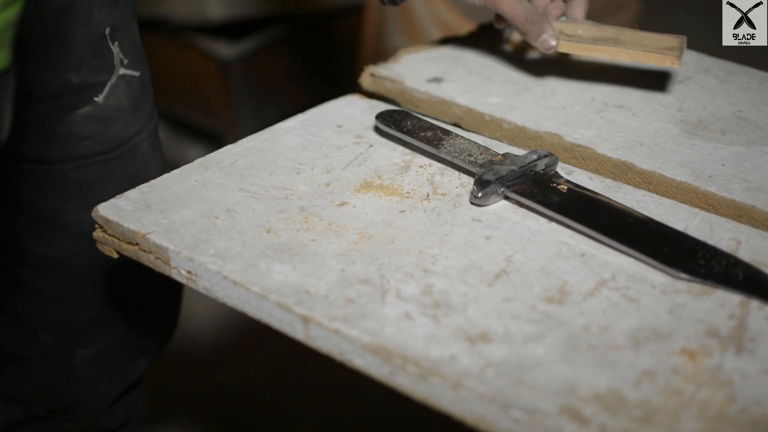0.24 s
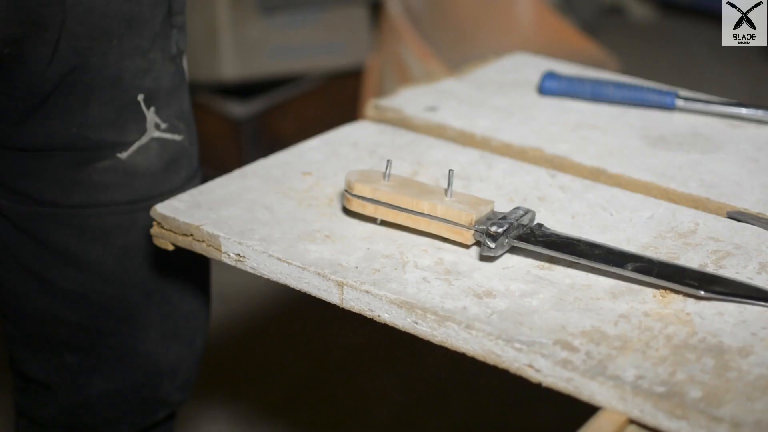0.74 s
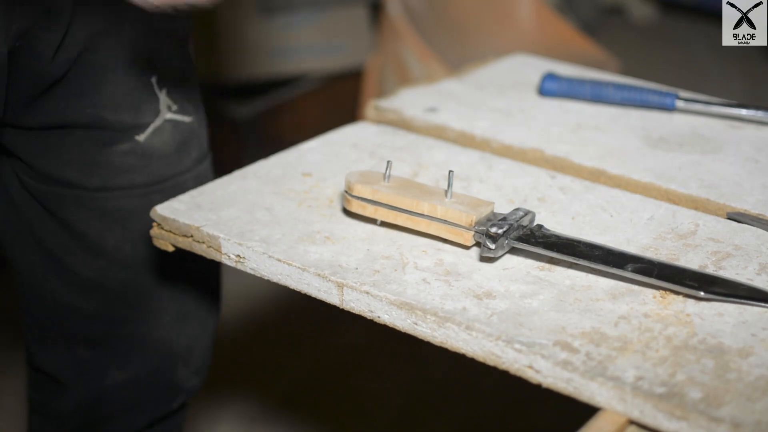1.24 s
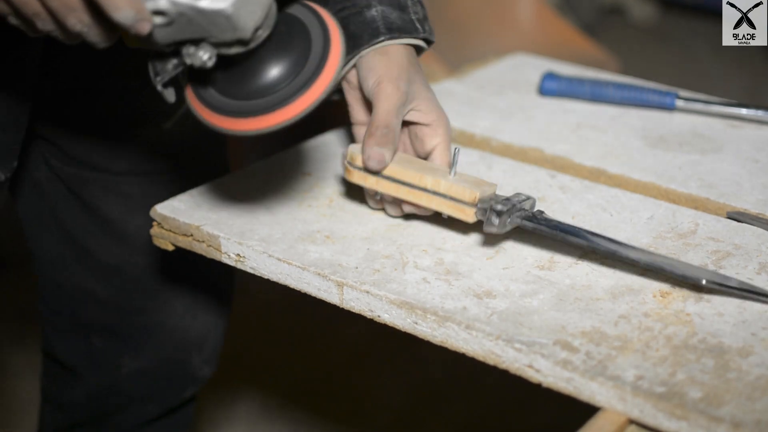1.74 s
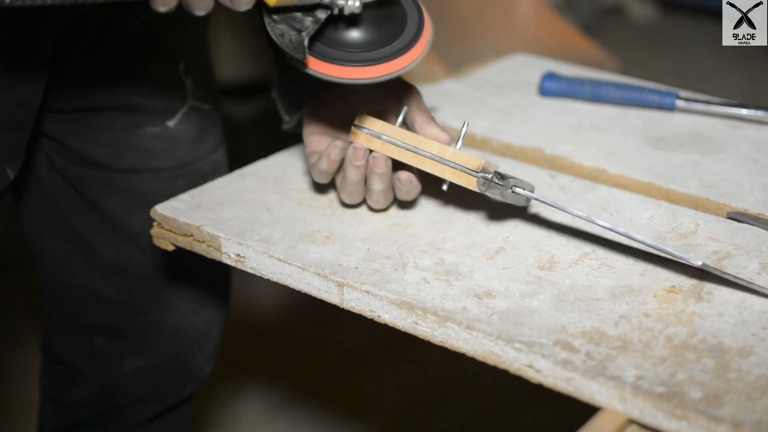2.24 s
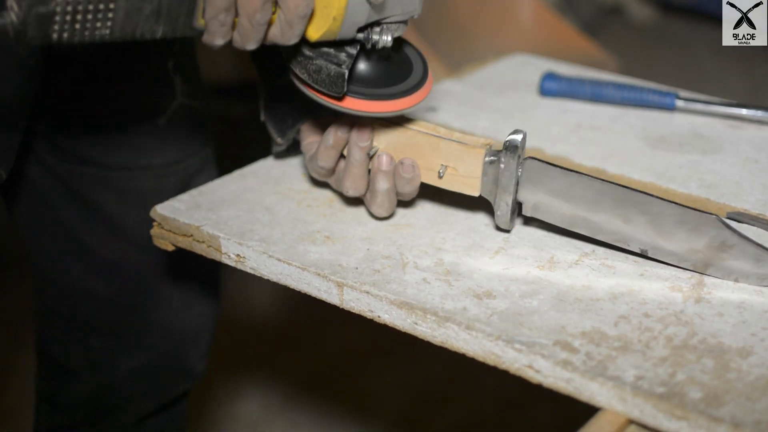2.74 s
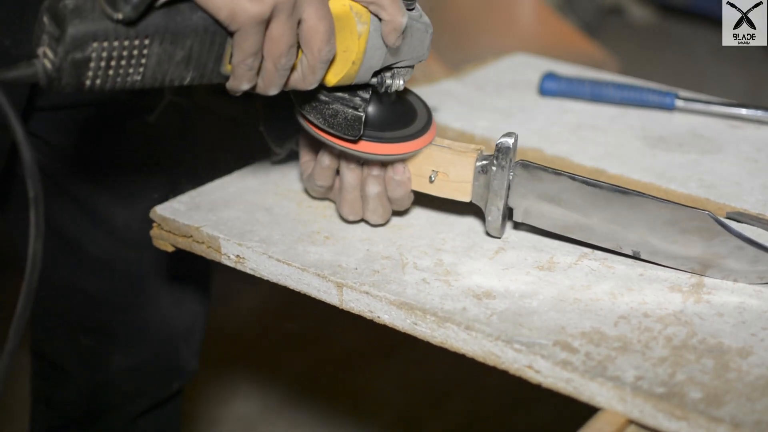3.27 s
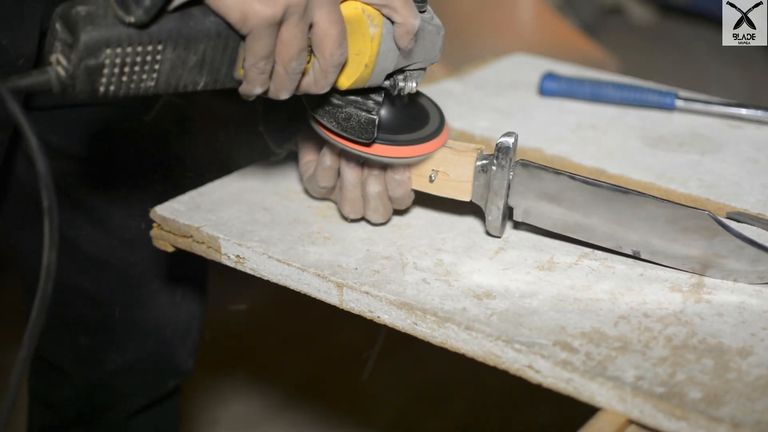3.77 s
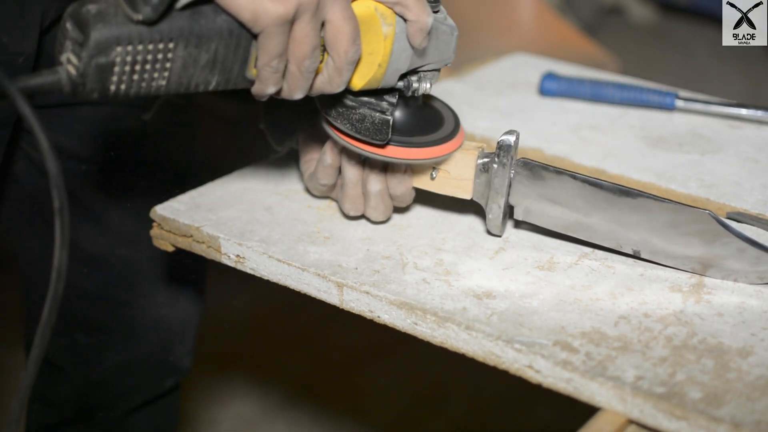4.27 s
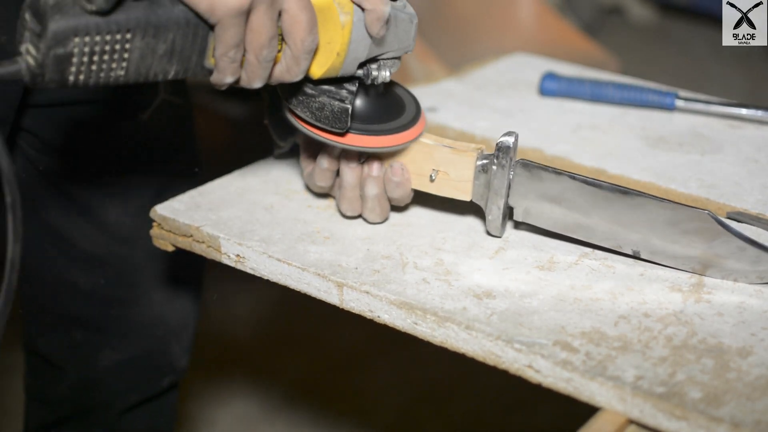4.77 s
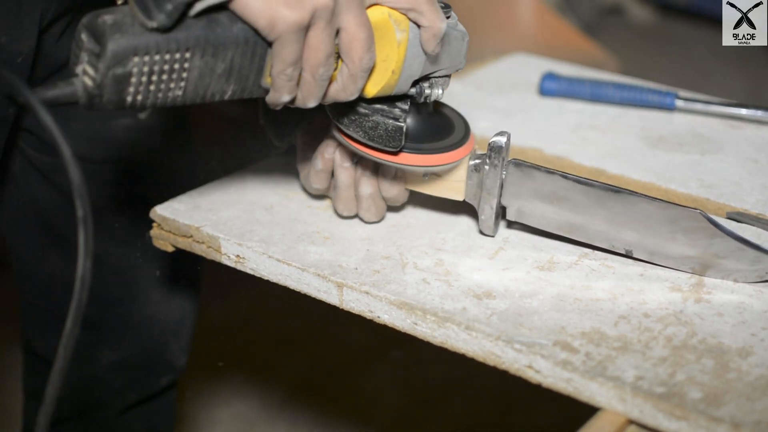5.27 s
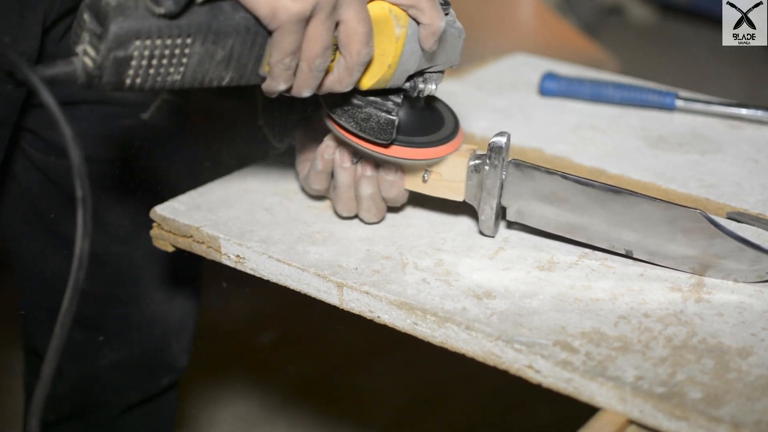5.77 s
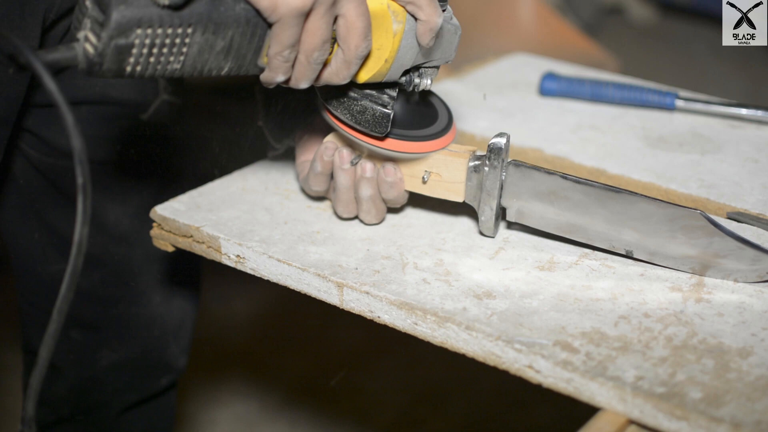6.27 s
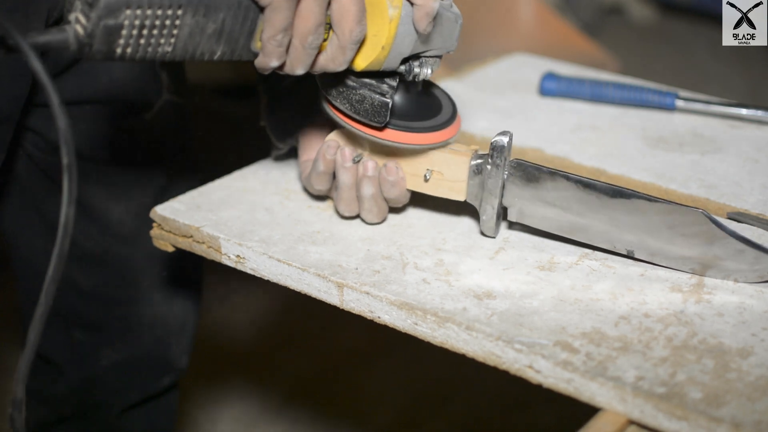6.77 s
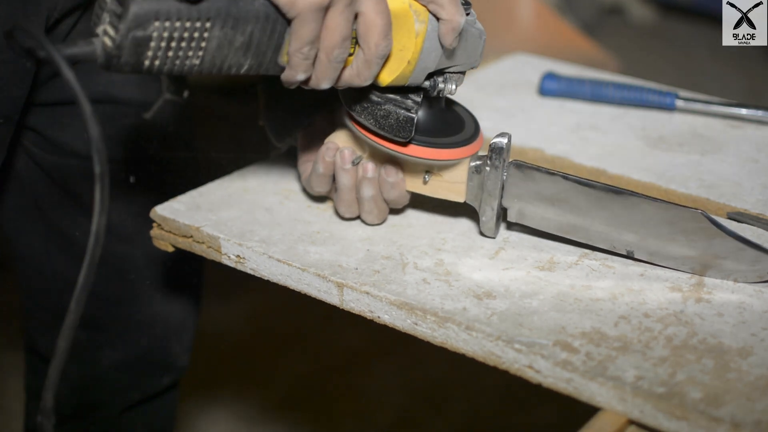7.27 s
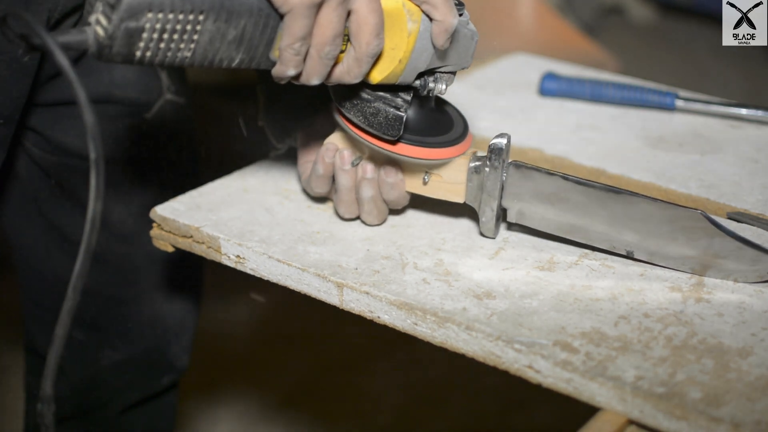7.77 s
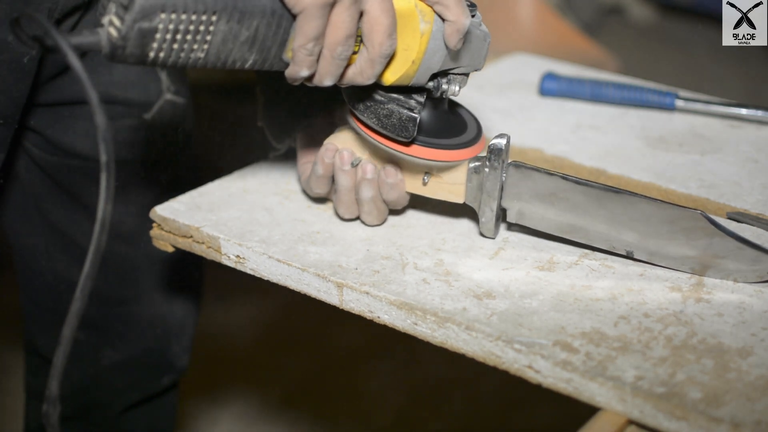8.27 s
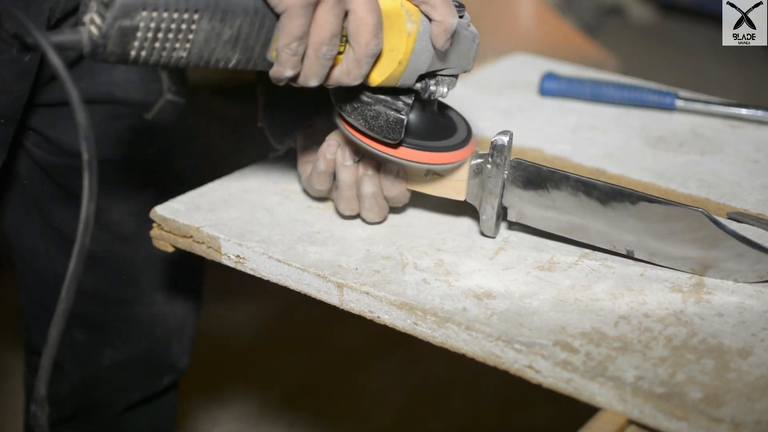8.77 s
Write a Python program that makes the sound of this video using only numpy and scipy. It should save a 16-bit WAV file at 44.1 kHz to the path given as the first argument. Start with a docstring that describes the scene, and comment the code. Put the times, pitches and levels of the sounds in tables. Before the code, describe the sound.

In a quiet, faintly humming workshop a rustle fades and a piece of wood lands with a quick double clack. After a sudden hush, a grinder switches on close by, crackling and buzzing as it runs up to a loud whining rush. Its gears rattle, then the sanding disc hisses over wood in long passes, briefly lifting between them. Close microphone, nearly central stereo, short dry reflections.

```python
"""In a quiet, humming workshop a rustle fades and a wooden handle scale is set down: its modes ring on the bench.
All drops to a hush, then an angle grinder starts up close: its brushes spit on every mains half-wave, then only fizz.
Fan rush, gears and motor whine follow the shaft speed as it runs up; cooling air hisses from the vents.
Then the disc sands the handle: each pass hisses, drags the speed down and takes up the play in the gears,
which rattle again when it lifts. Bench and walls scatter the sound into a nearly central stereo pair."""
import sys
import numpy as np
from scipy import signal
from scipy.fft import rfft, irfft
from scipy.io import wavfile
from scipy.ndimage import map_coordinates

SR = 44100
rng = np.random.default_rng(int(sys.argv[2]) if len(sys.argv) > 2 else 0)


def pcm_store(signal):
    """Save signal as 16-bit PCM."""
    levels = np.round(np.clip(np.atleast_2d(signal), -1, 1) * 32767)
    wavfile.write(sys.argv[1], SR, levels.astype(np.int16).T)


N = 397782
TIME = np.arange(N) / SR
MAINS_HZ = 50
GEAR_RATIO = 9 / 32  # disc turns per shaft turn
SWITCH_ON_S = .7965
# the tool is tipped so that its gear case faces the listener
TIP_S, TIP_LENGTH_S = 2.6, .3
# The motor flares up as it starts.
# Each row: start in seconds, dB added to the rush, dB added to the sparks.
FLARES = [(.955, 6.5, 4.5), (1.195, 1, 3), (1.4, 0.5, 0.5)]


def undb(db):
    """Decibels to gain."""
    return 10 ** (np.asarray(db) / 20)


def unit(x):
    """Scale to rms 1."""
    return x / np.sqrt(np.mean(x ** 2))


def noise():
    """White noise."""
    return rng.standard_normal(N)


def curve(table):
    """Rows of (seconds, value) joined by straight lines."""
    return np.interp(TIME, *np.transpose(table))


def walk(rate):
    """Random wander of rms 1 that heads for a new value rate times a second."""
    return unit(np.interp(TIME * rate, np.arange(N), noise()))


def ramp(start, length):
    """Rises from 0 at the start to 1 over the given length."""
    return np.clip((TIME - start) / length, 0, 1)


def bump(centre, length):
    """Swells smoothly to 1 and back."""
    return np.exp(-(2 * (TIME - centre) / length) ** 2)


def fade(start, t60):
    """Envelope that jumps to 1 and falls 60 dB in t60 seconds."""
    return (TIME >= start) * undb(np.maximum(-60 * np.abs(TIME - start) / t60, -300))


def colour(x, points):
    """Causal minimum-phase filter with the given (Hz, dB) response, made through its cepstrum."""
    hz, db = np.transpose(points)
    size = 8192
    bins = np.arange(size // 2 + 1) * SR / size
    log_gain = np.log(undb(np.interp(np.log(bins + 1), np.log(hz), db)))
    cepstrum = irfft(log_gain)
    # fold the negative times onto the positive ones
    cepstrum[1:size // 2] *= 2
    cepstrum[size // 2 + 1:] = 0
    response = irfft(np.exp(rfft(cepstrum)))
    return signal.fftconvolve(x, response)[:N]


def resonate(x, hz, width):
    """Two-pole resonance, gain 1 at its centre, width in Hz."""
    return signal.lfilter(*signal.iirpeak(hz, hz / width, fs=SR), x)


def room(room_db=-60, slide_db=-55, hum_width=.015):
    """The quiet workshop: wavering room noise, narrow steady hums and a rustle that fades away."""
    # Each row: frequency in Hz, relative level in dB.
    room_colour = [(30, -18), (55, -18), (80, -0.5), (120, -4.5), (400, 1.5), (750, 2.5), (1200, 1.5),
                   (2100, -4), (4000, -20), (14000, -36)]
    # The rustle; each row: frequency in Hz, relative level in dB.
    slide_colour = [(200, -22), (700, -7), (2000, 3), (4000, 0), (6500, -2), (10000, -11), (15000, -22)]
    # Hums of the workshop; each row: frequency in Hz, level in dB.
    hums = [(398, -70.5), (750, -69.5), (2010, -74), (2800, -77)]
    out = undb(room_db) * unit(colour(noise(), room_colour)) * undb(walk(8.4))
    out += undb(slide_db) * unit(colour(noise(), slide_colour)) * fade(0, 1.02) * undb(2 * walk(80))
    out += sum(undb(db) * unit(resonate(noise(), hz, hz * hum_width)) for hz, db in hums)
    return out


def wooden_scale(knock_db=4, ring_db=4):
    """The scale lands one end after the other: a knock and a sharp tick set off its decaying modes."""
    # Touch-downs; each row: time in seconds, relative level in dB, relative level of the tick in dB.
    clacks = [(.483, -51.5, -24), (.527, -48, -11)]
    # Modes of the wood on the bench; each row: frequency in Hz, relative level in dB, t60 in seconds.
    wood = [(710, -3, 0.22), (906, 7, 0.053), (1120, 3, 0.054), (1220, 6, 0.055), (1570, -1, 0.12),
            (1760, 1, .06), (2300, -15, .04), (3100, -11, 0.044)]
    knock_colour = [(300, -25), (800, 0), (1900, 1), (2800, -2), (3800, -12), (12000, -36)]
    out = np.zeros(N)
    for s, db, tick_db in clacks:
        ring = 0
        for k, (hz, mode_db, t60) in enumerate(wood):
            # neighbouring modes start in opposite directions
            mode = (-1) ** k * np.sin(2 * np.pi * hz * (TIME - s))
            ring = ring + undb(mode_db) * fade(s, t60) * mode
        knock = unit(colour(noise(), knock_colour)) * fade(s, .07)
        # the tick comes 3 ms ahead of the knock
        tick = unit(resonate(noise(), 7000, 14000)) * fade(s - .003, 0.022)
        out += undb(db) * (undb(ring_db) * ring + undb(knock_db) * knock + undb(tick_db) * tick)
    return out


def motor_speed(force, free_hz=631.7, run_up_s=.247, run_up_shape=.585, sag_hz=70, inertia_s=.862):
    """Shaft turns per second: a quick run-up that levels out, less a sag that follows the force slowly."""
    running_s = np.maximum(TIME - SWITCH_ON_S, 0)
    run_up = 1 - np.exp(-(running_s / run_up_s) ** run_up_shape)
    keep = np.exp(-1 / (inertia_s * SR))
    slow_force = signal.lfilter([1 - keep], [1, -keep], force)
    return free_hz * run_up - sag_hz * slow_force


def flare(start, attack_s=0.03, decay_s=0.082):
    """A quick swell that dies away."""
    return ramp(start, attack_s) * np.exp(-np.maximum(TIME - start - attack_s, 0) / decay_s)


def sparking(spark_db=-28, attack_s=0.14, hold_end_s=1.96, fall_db_per_s=22, fizz_db=-45):
    """Strength of the sparks: high while the motor draws its starting current, then a faint fizz."""
    db = np.maximum(spark_db - fall_db_per_s * np.maximum(TIME - hold_end_s, 0), fizz_db)
    flare_db = sum(added_db * flare(s) for s, _, added_db in FLARES)
    return ramp(SWITCH_ON_S, attack_s) * undb(db + flare_db)


def brushes(speed, spark_s=0.001, scatter_db=3.5, steady=0.18, first_db=-27, ping_db=-36):
    """Current is switched in on each mains half-wave and the brushes spit."""
    # Each row: frequency in Hz, relative level in dB.
    spark_colour = [(300, -26), (700, -9.5), (1100, -5.5), (1900, -8), (2600, -4.5), (4000, 2), (4600, -5),
                    (5200, -1.5), (7000, -10), (9000, -3), (10600, -12), (11400, 0), (12000, 2.5),
                    (13200, -9), (15700, -14)]
    kick_colour = [(300, -39), (1200, 0), (1900, 9), (5000, -4), (8000, -6), (15000, -21)]
    half_waves = np.maximum(TIME - SWITCH_ON_S, 0) * 2 * MAINS_HZ
    # time since the half-wave began, in spark lengths
    age = half_waves % 1 / (2 * MAINS_HZ * spark_s)
    # the sparks grow more uneven as the rotor gathers speed
    scatter = np.clip(noise(), -2, 1.5)[half_waves.astype(int)]
    size = undb(scatter_db * speed * scatter)
    surge = size * age * np.exp(1 - age)
    spits = noise() * (surge + steady * (.5 + speed))
    # while the rotor is still slow, each surge jolts the armature and it pings
    slow = np.interp(speed, [.15, .35, .6], [0, 1, 0])
    pings = unit(resonate(resonate(noise() * surge, 5200, 600), 5300, 600)) * slow
    first_kick = unit(colour(noise(), kick_colour)) * fade(SWITCH_ON_S, 0.023)
    spits = unit(colour(spits, spark_colour)) * sparking()
    return spits + undb(ping_db) * pings + undb(first_db) * first_kick


def fan_and_gears(shaft, speed, load, tooth_db=0.5, flutter_db=0.28, grain_db=4):
    """Dense tooth impacts and fan turbulence, a little uneven, louder with speed and softer under load."""
    # Each row: frequency in Hz, relative level in dB.
    rush_colour = [(30, -35.5), (250, -36), (350, -31), (480, -16), (700, -18), (950, -8.5), (1150, -5),
                   (1500, -1.5), (2500, -1), (3100, -6.5), (4200, -7.5), (7300, -10), (10000, -16),
                   (15700, -21)]
    rush_db, speed_power, loaded_db = -23, 1.34, -1
    uneven_db = tooth_db * walk(700) + flutter_db * walk(45)
    grains = noise() * undb(grain_db * np.clip(noise(), -2, 2) + uneven_db)
    impacts = grains * (1 + 0.11 * np.cos(2 * np.pi * shaft))
    # the tool starts 4 dB down and is brought over the work
    db = rush_db + loaded_db * load - 4 * (1 - ramp(1.3, 1))
    db = db + sum(added_db * flare(s) for s, added_db, _ in FLARES)
    # the rush dips briefly
    db = db - 3.5 * bump(6.54, 0.13)
    return unit(colour(impacts, rush_colour)) * undb(db) * speed ** speed_power


def radiated(hz, response):
    """Gain of a (Hz, dB) response at a moving pitch."""
    return undb(np.interp(hz, *np.transpose(response)))


def tones(shaft, shaft_hz, speed, load, facing, waver_db=2, jitter=0.0056, whine_db=-2):
    """Lines of motor and disc; load shifts the weight among them and the housing colours moving pitches."""
    # How the housing radiates the shaft tone; each row: frequency in Hz, level in dB.
    shaft_response = [(300, -85), (370, -56), (430, -48), (515, -41), (570, -45.5), (585, -48),
                      (603, -47.5), (613, -57)]
    # The same for its fourth harmonic; each row: frequency in Hz, relative level in dB.
    whine_response = [(1200, -75), (1480, -54), (1720, -51), (1930, -38), (2100, -50), (2280, -44),
                      (2335, -38), (2395, -36.5)]
    # The same for the armature slots; each row: frequency in Hz, relative level in dB.
    slot_response = [(3000, -68), (3350, -53), (3750, -38), (4130, -35), (4480, -28.5), (4700, -36),
                     (5000, -55)]
    # Motor overtones at running speed.
    # Each row: multiple of the shaft rate, mean level in dB with the disc free, the same with it loaded.
    whine = [(3, -64, -57), (5, -54, -64), (6, -51, -46), (8, -62, -53), (9, -56, -41), (12, -51, -61),
             (24, -50, -62)]
    # Disc wobble at running speed.
    # Each row: multiple of the disc rate, relative level in dB with the disc free, the same with it loaded.
    wobble = [(1, -68.5, -74), (2, -70, -63), (3, -56.5, -61), (4, -59, -54.5), (5, -50, -57.5),
              (6, -64, -66), (7, -48, -48), (8, -47, -55), (9, -51, -48), (10, -54, -46), (20, -60, -49.5),
              (28, -56, -52.5)]
    shaft = shaft + jitter * walk(60)  # jitter in turns
    out = radiated(shaft_hz, shaft_response) * undb(walk(15)) * np.sin(2 * np.pi * shaft)
    # the fourth harmonic of the shaft sings out when the gears run slack
    slack_db = 6 * facing * (1 - load)
    fourth_gain = radiated(4 * shaft_hz, whine_response) * undb(whine_db + slack_db + walk(40))
    out += fourth_gain * np.sin(2 * np.pi * 4 * shaft)
    # twelve armature slots, throbbing with the mains current
    throb = 1 + .6 * np.cos(2 * np.pi * 2 * MAINS_HZ * (TIME - SWITCH_ON_S))
    out += radiated(12 * shaft_hz, slot_response) * throb * np.sin(2 * np.pi * 12 * shaft)
    # the disc drones more the faster it turns on the wood: dB per Hz of shaft rate from 582.2 Hz
    drone_db = 0.2837 * (shaft_hz - 582.2) * load
    for table, turns, swell_db in ((whine, shaft, 0), (wobble, shaft * GEAR_RATIO, drone_db)):
        for order, free_db, loaded_db in table:
            waver = waver_db * (walk(2.88) + walk(35)) / 2
            db = free_db + (loaded_db - free_db) * load + swell_db + waver
            out += undb(db) * np.minimum(speed, 1) ** 8 * np.sin(2 * np.pi * order * turns)
    return np.sqrt(2) * out  # sine levels become rms levels


def vents():
    """Cooling air hisses out of the slots, louder as they turn towards the listener."""
    # Each row: time in seconds, level in dB.
    vent_levels = [(.9, -55), (1.05, -41), (1.45, -40), (1.7, -33), (2.15, -31), (2.5, -32.5), (2.9, -37),
                   (3.3, -45)]
    air = resonate(resonate(noise(), 7300, 3100), 7300, 3100)
    return unit(air) * undb(curve(vent_levels))


def low_thuds():
    """Low, dull thuds: quickly fading low noise."""
    # Each row: start in seconds, level in dB.
    thuds = [(1.263, -44), (1.425, -47), (6.409, -41)]
    low_noise = unit(colour(noise(), [(30, 0), (300, -6), (900, -26), (4000, -60)]))
    return low_noise * sum(undb(db) * fade(s, .06) for s, db in thuds)


def backlash(load, facing, chatter_db=2.5, free_db=-31, loaded_db=-41.5):
    """Loose teeth knock irregularly and ring the gear case, most when the disc is lifted."""
    # Resonances of the gear case; each row: frequency in Hz, width in Hz, relative level in dB.
    case = [(2330, 240, 0.5), (2625, 140, 4), (2039, 270, -3), (3290, 180, -9)]
    knocks = noise() * undb(chatter_db * walk(300))
    level = facing * undb(free_db + (loaded_db - free_db) * load)
    return unit(sum(undb(db) * resonate(knocks, hz, width) for hz, width, db in case)) * level


def handwork(lift_s=.06, skim_db=-48, lean_db=3):
    """Force on the disc and the loudness of its bite: each pass beds in, holds and lifts off."""
    # The disc is laid on the wood.
    # Each row: start in seconds, end in seconds, time to bed in in seconds, relative force,
    # hiss in dB before the hand leans.
    passes = [(2.92, 4.34, 0.46, 1.055, -28.5), (4.573, 4.74, .06, .2, -35), (4.86, 6.58, .16, .953, -28.5),
              (6.92, 8.53, .08, .887, -28.5), (8.66, 9.099, .1, .795, -27.5)]
    # The hand leans in or eases off.
    # Each row: centre in seconds, length in seconds, change of force as a share.
    leans = [(3.971, 0.13, 0.38), (4.15, .2, -0.69), (5.551, .3, 0.21), (5.951, 0.26, -.66),
             (6.24, .1, .25), (6.45, .15, .38), (7.949, 0.39, .33)]
    lean = sum(change * bump(s, length) for s, length, change in leans)
    # a faint hiss of the disc just skimming goes on between passes
    force, hiss = 0, undb(skim_db) * ramp(TIP_S, TIP_LENGTH_S)
    for start, end, bed_in, push, db in passes:
        contact = ramp(start, bed_in) * (1 - ramp(end - lift_s, lift_s))
        force = force + push * contact
        # lean_db: extra hiss at double force
        hiss = np.hypot(hiss, undb(db + lean_db * lean) * contact)
    return force * (1 + lean), hiss


def turning_grit(turns, memory, grain_db, size=256):
    """Grains fixed round a wheel: each turn repeats the one before, a little worn."""
    keep = np.clip(memory, 0, .98)
    fresh = rng.standard_normal((2, 2048, size))  # height and weight, turns, grains round the wheel
    height, weight = signal.lfilter([np.sqrt(1 - keep ** 2)], [1, -keep], fresh, axis=1)
    track = (height * undb(grain_db * np.clip(weight, -2, 2))).ravel()
    return unit(map_coordinates(track, [turns * size], order=3, mode="wrap"))


def sanding(disc, hiss, runout=0.43, bite_db=1.84):
    """Grit tears the wood; the disc runs out of true, bites harder once a turn and catches an edge."""
    # Each row: frequency in Hz, relative level in dB.
    sand_colour = [(300, -32.5), (700, -11.5), (1100, -13.5), (1500, -3.5), (2100, -1.5), (2650, 3),
                   (3100, -8.5), (3900, 2.5), (4600, -2.5), (5200, -6), (7500, -5.5), (9500, -8),
                   (13000, -7), (15700, -9.5)]
    # The disc catches an edge; each row: start in seconds, level in dB.
    snag_hits = [(6.396, -19), (6.412, -13), (6.42, -17), (6.432, -24), (6.5, -27), (6.519, -27),
                 (6.531, -28)]
    grit = turning_grit(disc, memory=0.78, grain_db=4.5)
    uneven = undb(bite_db * walk(500) + 0.45 * walk(25))
    bite = (1 + runout * np.cos(2 * np.pi * disc)) * uneven
    snags = unit(colour(noise(), sand_colour)) * sum(undb(db) * fade(s, 0.012) for s, db in snag_hits)
    return unit(colour(grit * bite, sand_colour)) * hiss + snags


def swaying(x, sway_s=0.000296, sway_hz=1.2):
    """The hand never holds still, so the paths to the surfaces keep changing a little."""
    return map_coordinates(x, [(TIME - sway_s * walk(sway_hz)) * SR], order=3, mode="nearest")


def reflections(x, t60, count):
    """Sound scattered by surfaces: a decaying noise response of unit energy, count samples long."""
    age = np.arange(count) / SR
    decay = np.exp(-np.log(1000) * age / t60)
    response = rng.standard_normal(count) * decay * (age > .001)
    return signal.fftconvolve(x, response / np.linalg.norm(response))[:N]


def scene(wall_db=-12, bench_db=-15, hush_db=-26):
    """All parts of the grinder turn with one shaft; bench and walls scatter the sound."""
    # Side against mid; each row: frequency in Hz, level in dB.
    width_curve = [(60, -16), (150, -20), (300, -27), (600, -22), (850, -46), (1300, -65), (2000, -75),
                   (2800, -26.5), (4000, -15), (8000, -16), (14000, -7)]
    force, hiss = handwork()
    shaft_hz = motor_speed(force)
    shaft = np.cumsum(shaft_hz) / SR  # turns
    speed = shaft_hz / np.median(shaft_hz)
    # the harder the disc bites, the more the gears are loaded
    load, facing = np.clip(force, 0, 1), ramp(TIP_S, TIP_LENGTH_S)
    work = brushes(speed) + fan_and_gears(shaft, speed, load)
    work += tones(shaft, shaft_hz, speed, load, facing) + vents()
    work += low_thuds() + backlash(load, facing)
    work += sanding(shaft * GEAR_RATIO, hiss)
    near = room() + wooden_scale() + work * (TIME >= SWITCH_ON_S)
    # soft clutter in the shop swallows the lows
    bright = colour(swaying(near), [(500, -16), (1500, 0.0)])
    off_bench = undb(bench_db) * reflections(bright, t60=0.086, count=2048)
    off_walls = undb(wall_db) * reflections(bright, t60=0.06, count=16384)
    mid = near + off_bench + off_walls
    # the diffuse room sound differs between left and right
    side = colour(reflections(mid, t60=0.18, count=16384), width_curve)
    # everything drops to a hush for a moment before the switch-on
    hush = np.where((TIME > .677) & (TIME < SWITCH_ON_S), undb(hush_db), 1)
    # left a touch louder than right, in dB
    return np.array([mid + side, mid - side]) * undb([[.15], [-.15]]) * hush


def record(dry, top_hz=15850):
    """The top is cut steeply by an elliptic low-pass."""
    return signal.sosfilt(signal.ellip(12, .1, 80, top_hz, fs=SR, output="sos"), dry)


dry = scene()
out = record(dry)
pcm_store(out)
```